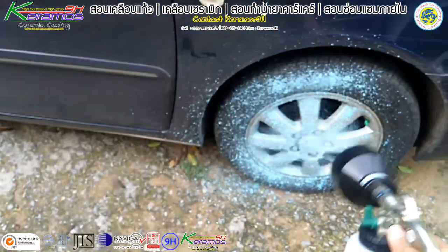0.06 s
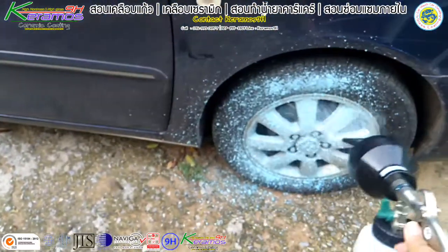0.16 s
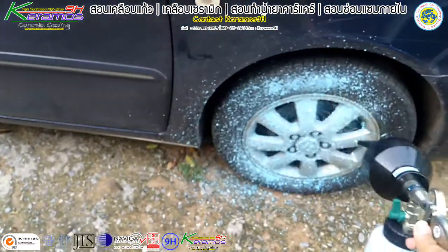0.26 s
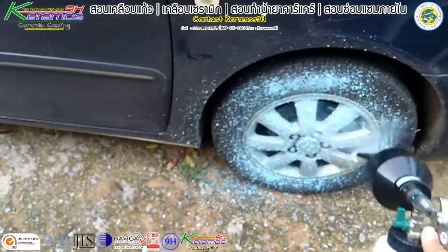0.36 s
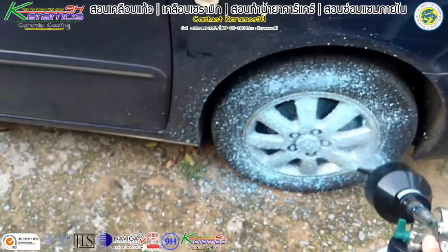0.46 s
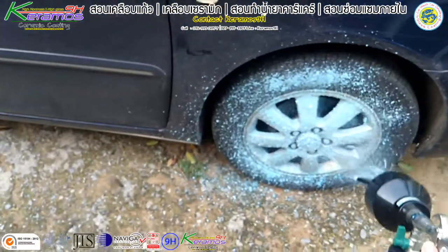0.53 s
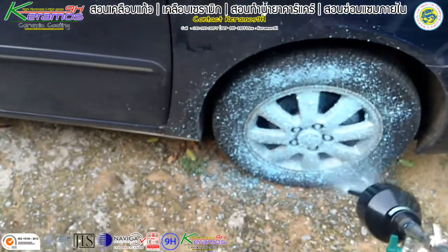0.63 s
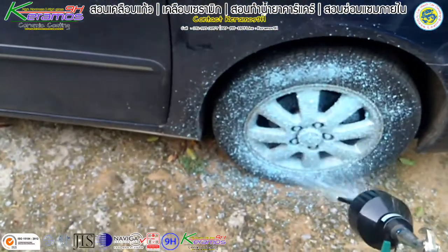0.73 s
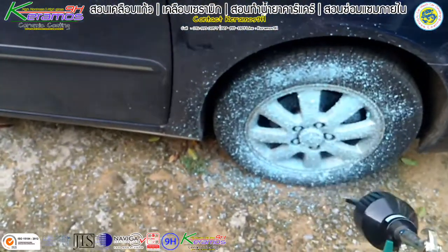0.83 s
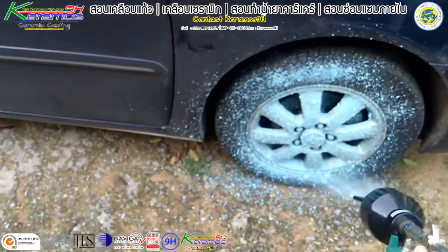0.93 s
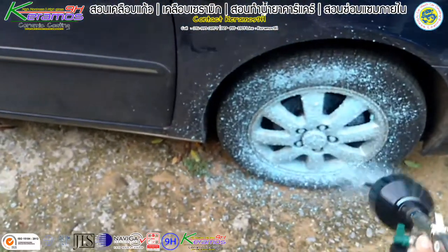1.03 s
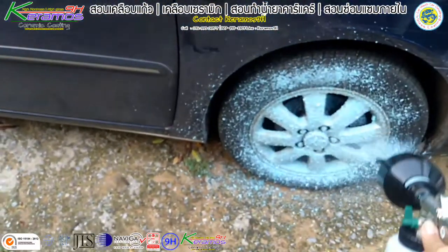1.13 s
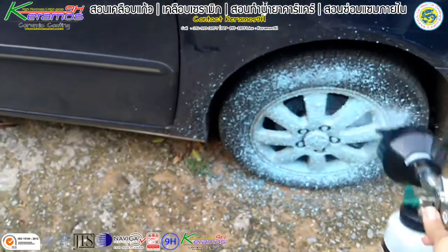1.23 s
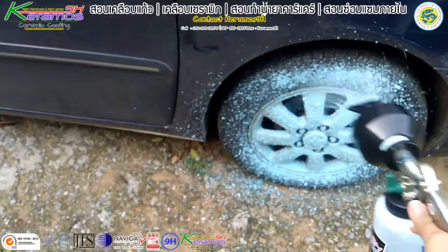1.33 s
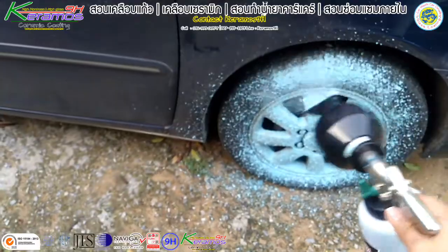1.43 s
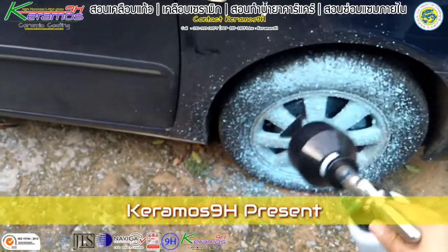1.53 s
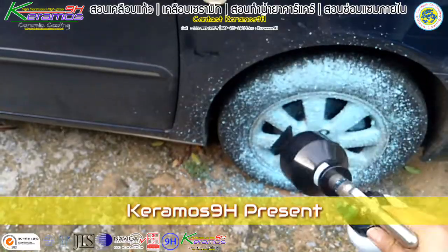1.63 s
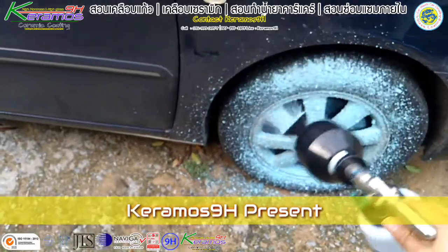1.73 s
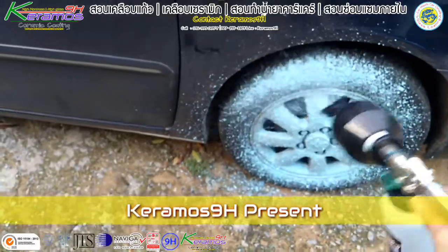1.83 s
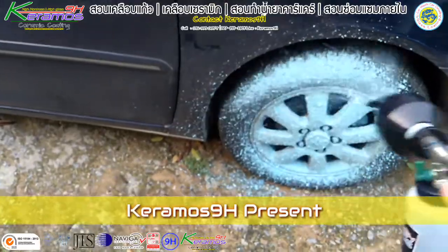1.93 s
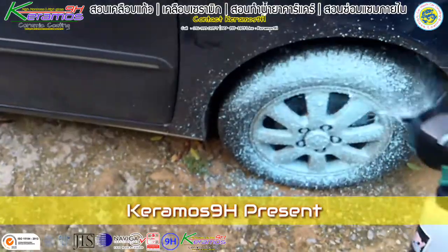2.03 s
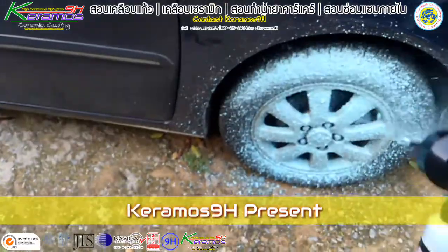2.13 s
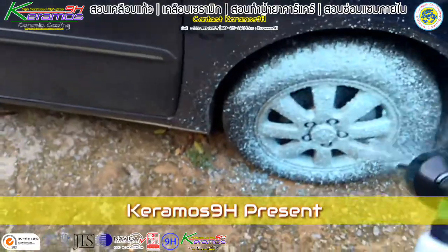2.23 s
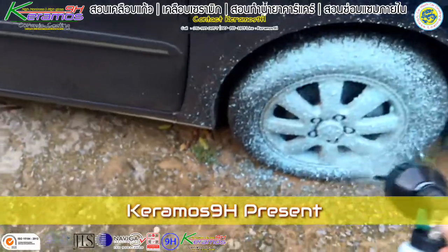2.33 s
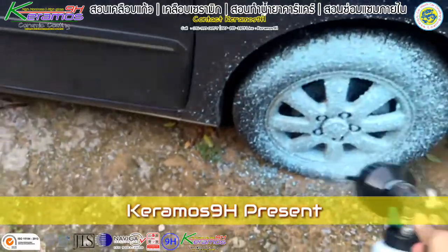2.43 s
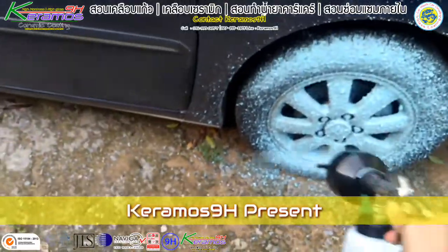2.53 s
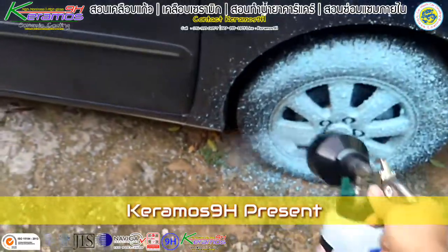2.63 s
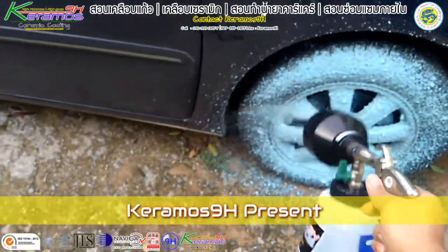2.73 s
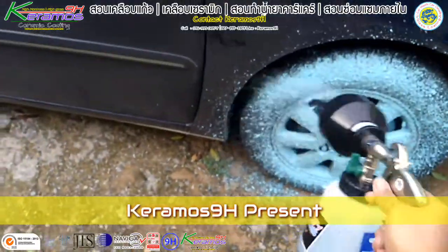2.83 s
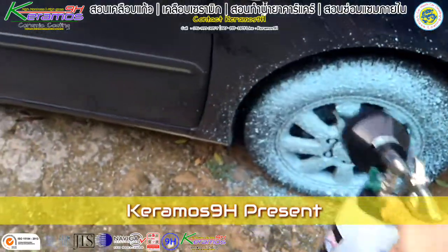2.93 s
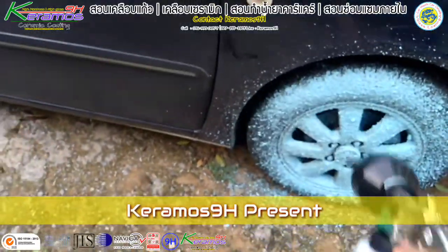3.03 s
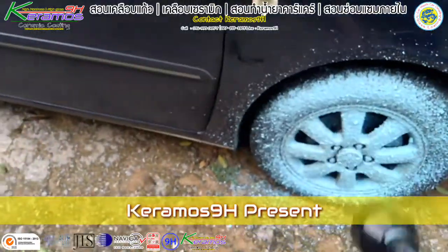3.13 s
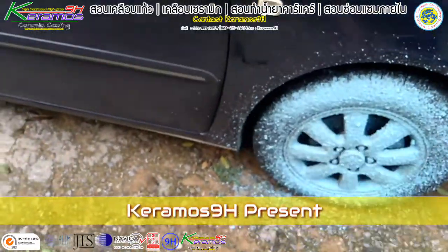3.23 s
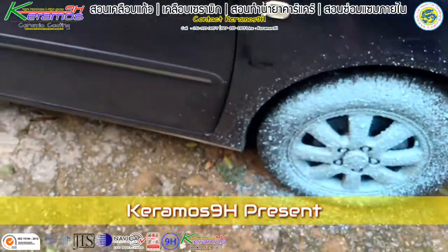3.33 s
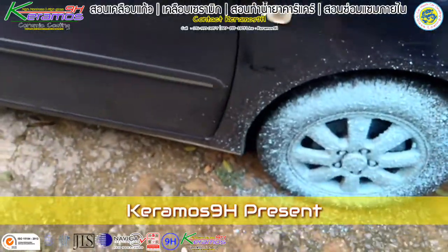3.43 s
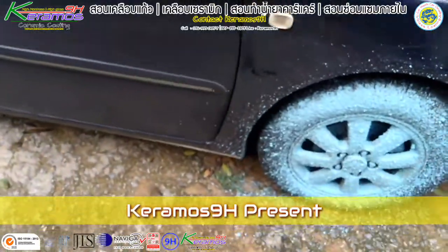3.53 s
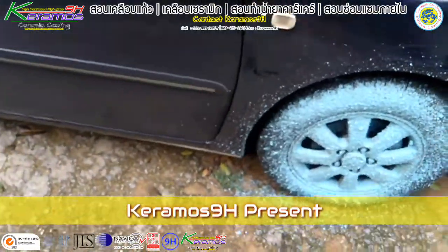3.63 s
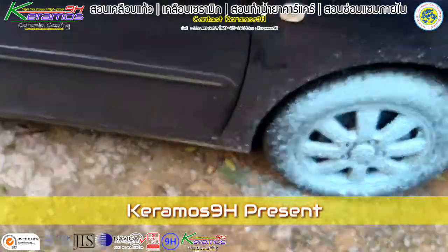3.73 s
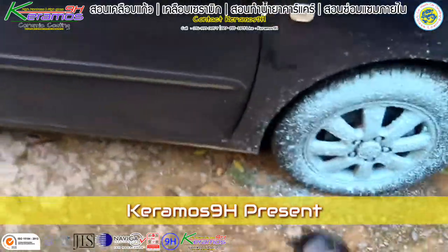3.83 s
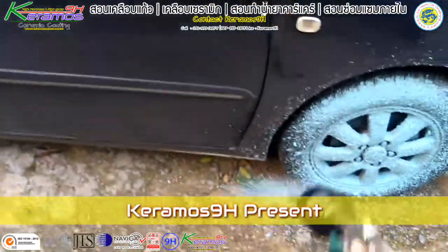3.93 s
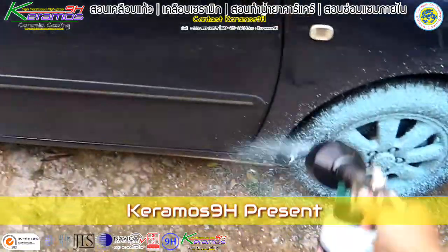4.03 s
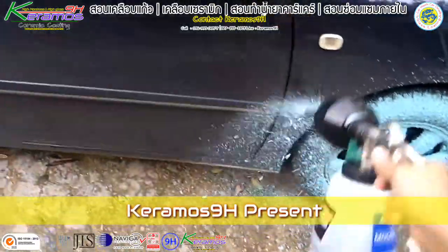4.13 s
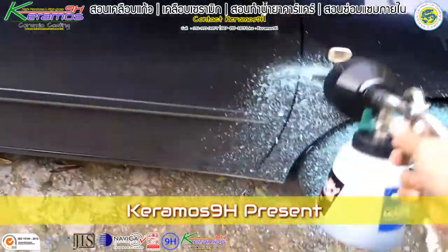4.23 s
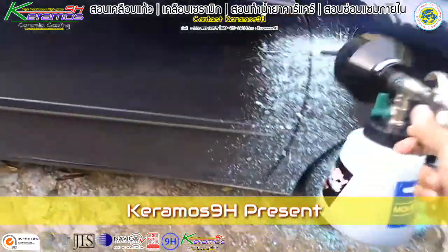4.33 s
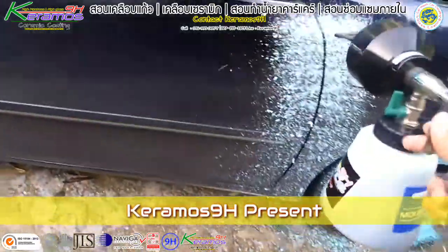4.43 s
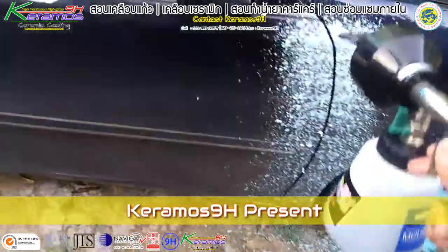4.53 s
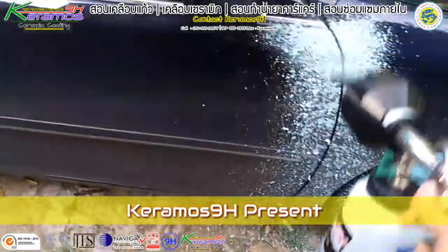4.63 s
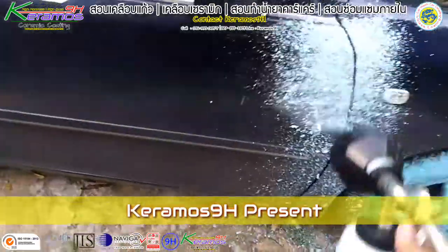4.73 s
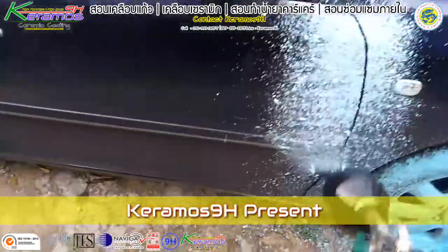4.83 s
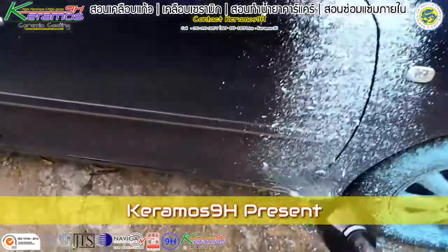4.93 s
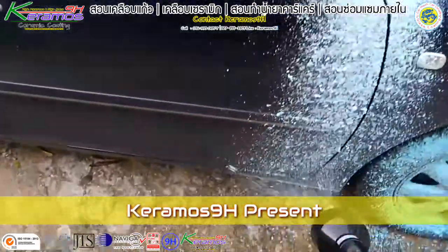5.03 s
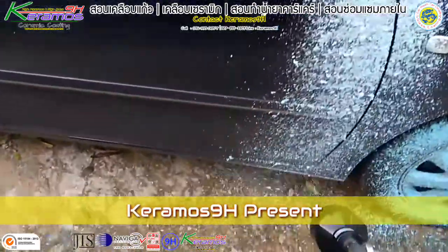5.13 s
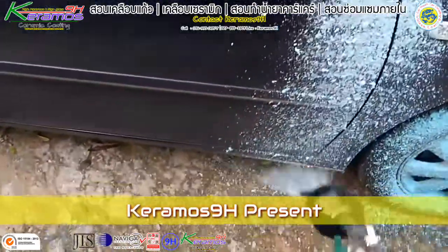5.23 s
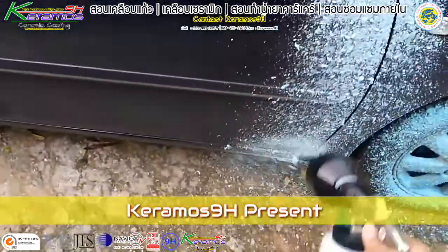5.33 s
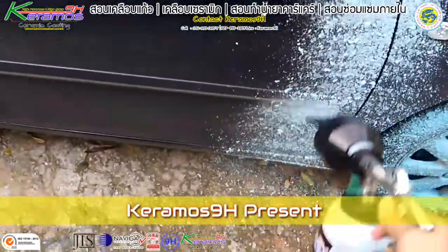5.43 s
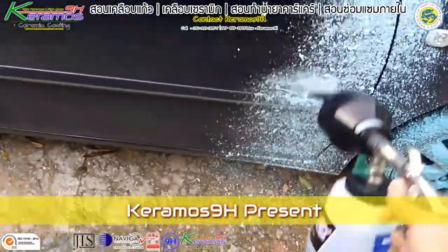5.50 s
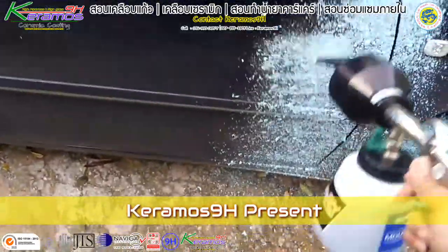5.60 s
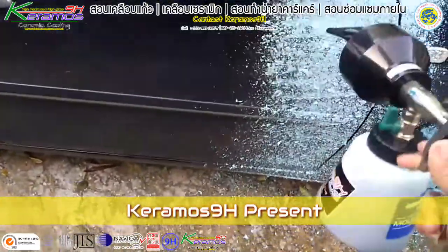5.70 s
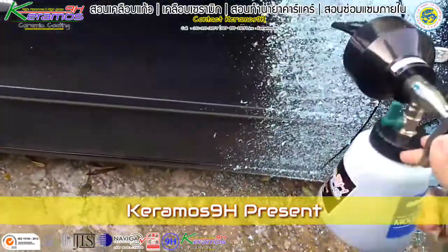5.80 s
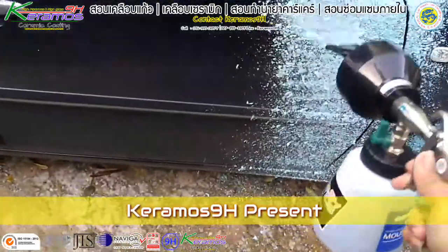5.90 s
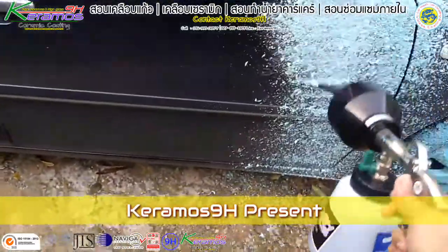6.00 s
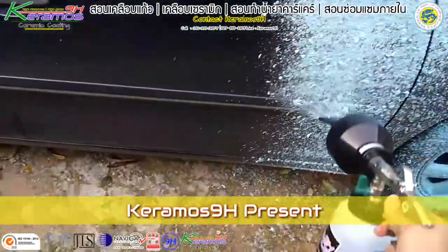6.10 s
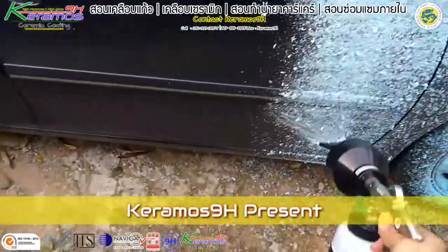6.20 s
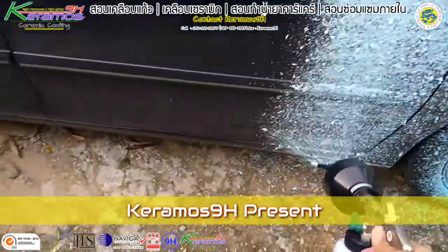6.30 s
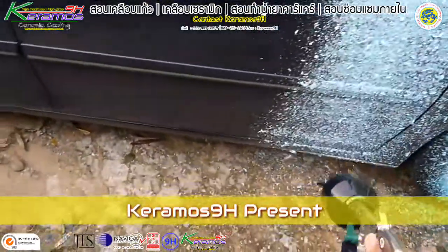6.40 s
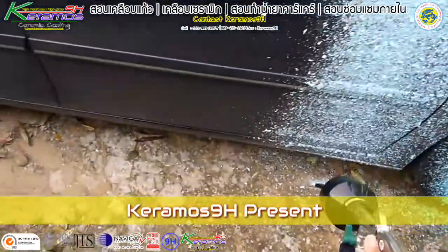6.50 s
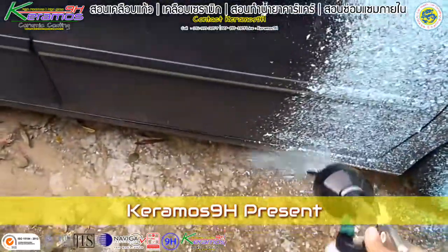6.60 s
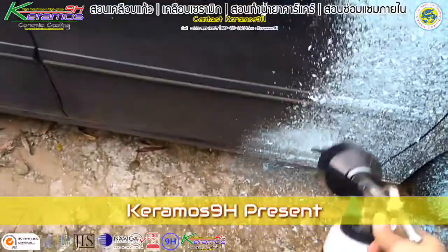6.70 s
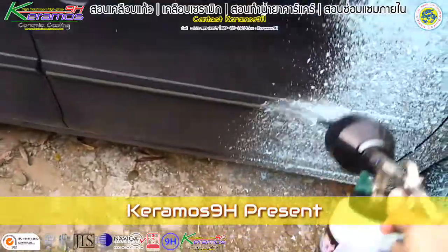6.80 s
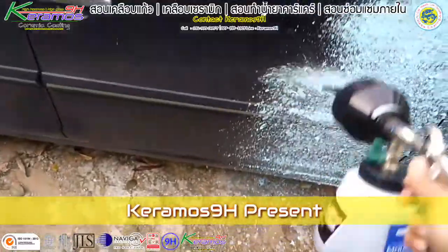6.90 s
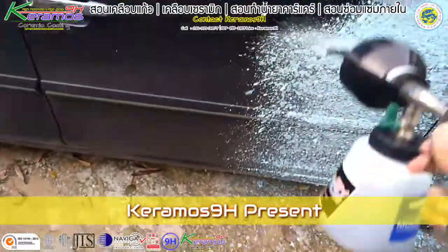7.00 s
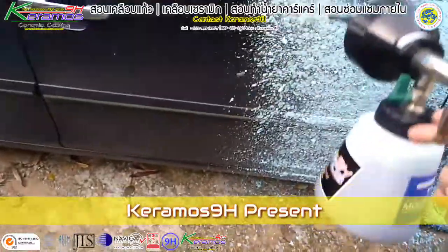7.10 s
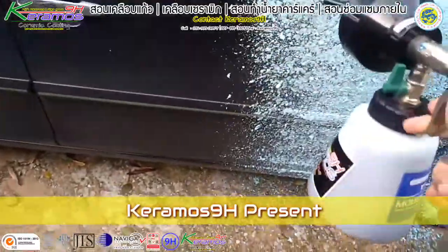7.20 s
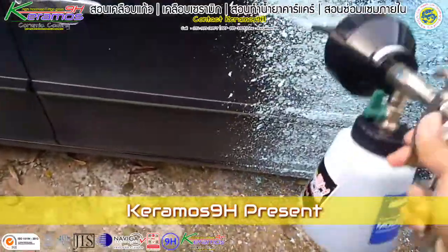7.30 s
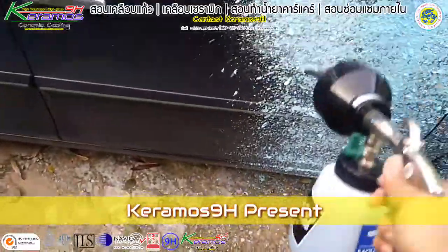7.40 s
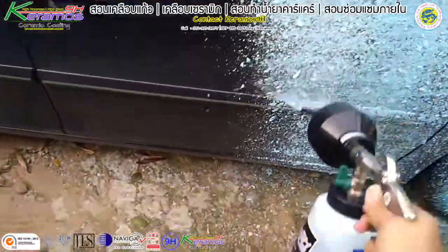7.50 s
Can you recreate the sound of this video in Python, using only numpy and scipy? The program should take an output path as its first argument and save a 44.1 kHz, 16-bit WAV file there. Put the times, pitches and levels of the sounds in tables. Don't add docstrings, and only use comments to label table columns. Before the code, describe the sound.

Outdoors beside a car on gravel, a compressed-air foam gun is already spraying. Ten loud, gritty hisses follow one another, first at the wheel with one long pull, then, after a one-second pause, shorter regular pulls at the door. Most end with a quick high whistle. A compressor thumps and hums low in the gaps, and a far engine faintly revs late. Close phone microphone, wide stereo, spray brighter and stronger on the right.

```python
import sys
import numpy as np
from scipy import signal
from scipy.fft import rfft, irfft, next_fast_len
from scipy.io import wavfile
from scipy.ndimage import uniform_filter1d, map_coordinates

SR = 44100
rng = np.random.default_rng(int(sys.argv[2]) if len(sys.argv) > 2 else 0)


def materialize(psi):
    bounded = np.clip(np.atleast_2d(psi).T, -1, 1)
    quanta = np.round(bounded * 32767).astype(np.int16)
    wavfile.write(sys.argv[1], SR, quanta)


def boost(x):
    u = np.asarray(x, float) / 20
    return 10 ** u


N = 332955
PAD = next_fast_len(N + SR)
TIME = np.arange(N) / SR
HZ = np.maximum(np.fft.rfftfreq(PAD, 1 / SR), 1)
DOOR_TURN_S = 3.5

# valve cracks open in seconds, full flow in seconds,
# finger lets go in seconds, level of the first crack in dB.
TRIGGER_PULLS = [
    (-.3, -.2, 0.38, -25),
    (0.461, 0.492, 0.92, -23),
    (1.037, 1.062, 1.5674, -22),
    (1.836, 1.864, 2.962, -27),
    (3.975, 4.006, 4.54, -32),
    (4.678, 4.707, 5.197, -26.5),
    (5.327, 5.352, 5.845, -27),
    (5.979, 6.003, 6.479, -28.5),
    (6.626, 6.65, 7.24, -24),
    (7.342, 7.402, 7.706, -36),
]


def valve():
    closed_db, blow_db = -66, -6
    spit_s = .004
    pulls = []
    for crack, full, off, crack_db in TRIGGER_PULLS:
        times = [crack - spit_s, crack, full - spit_s, full, off, off + 0.019, off + 0.067, off + 0.26]
        levels_db = [closed_db, crack_db, blow_db, 0, 0, -32.5, -49, closed_db]
        pulls.append(np.interp(TIME, times, levels_db))
    return np.max(pulls, axis=0)


# flow at first in dB, flow at last in dB, splash against the jet in dB,
# fine hiss against the jet in dB, brightest frequency in Hz.
PULL_AIMS = [
    (-19.5, -19.5, -11, -10, 5050),
    (-20, -24, -11, -9, 5000),
    (-21, -21.5, -11, -8, 4800),
    (-20.5, -22, -10.5, -9, 5050),
    (-19, -22, -11.5, -8.5, 5150),
    (-18.5, -21, -11, -8, 5000),
    (-19.5, -20, -11, -7.5, 5640),
    (-19, -22, -12, -7.5, 5940),
    (-20, -20.5, -11, -8, 5200),
    (-18, -24, -12, -8.5, 5900),
]
# middle in seconds, length in seconds, change of flow in dB.
WRIST_SWINGS = [(.07, .03, 1.5), (2.0, 0.047, -0.5), (2.13, 0.045, -1), (2.43, 0.09, -1.5),
                (2.764, 0.084, 2.5), (4.2, 0.086, 0), (5.75, 0.05, 1.5), (6.09, .03, -2.5),
                (6.2, 0.045, 1.8), (6.3, 0.021, -1), (6.68, .04, -2), (7.098, 0.078, 1.1)]


def flow():
    surge_db, surge_s = 3, 0.065
    crack, full, off, _ = np.transpose(TRIGGER_PULLS)
    pull = np.searchsorted(crack[1:], TIME)
    first_db, last_db, *aim = np.array(PULL_AIMS)[pull].T
    since = np.maximum(TIME - full[pull], 0)
    sag_db = (last_db - first_db) * np.minimum(since / (off - full)[pull], 1)
    change_db = surge_db * np.exp(-since / surge_s) + sag_db + swells(WRIST_SWINGS)
    return first_db, change_db, aim


# frequency in Hz, level in dB per Hz.
JET_COLOUR = [(150, -29), (250, -14), (388, -17), (535, -18.5), (951, -6.5), (1150, -3), (1610, -4.5),
              (2290, -3), (2760, -4.5), (3300, -2), (5300, 0.5), (7000, -2.5), (10000, -3), (14300, -10)]


def jet(opening_db, sputter_db):
    jet_db, change_db, (splash_db, fine_db, _) = flow()
    splash_db = splash_db + 0.62 * change_db
    fine_db = fine_db + 0.61 * change_db
    soap_lag_s = 0.0032
    soap_db = np.minimum(opening_db, np.interp(TIME - soap_lag_s, TIME, opening_db))
    noise = rfft(rng.standard_normal(PAD)) * boost(at_hz(JET_COLOUR))
    low = 1 / (1 + (HZ / 2000) ** 6)
    high = 1 / (1 + (7000 / HZ) ** 10)
    # band, level in dB, how unevenly it sputters
    parts = [(low, splash_db + 0.74 * soap_db, 1.1),
             (1 - low - high, change_db + opening_db, .9),
             (high, fine_db + 0.59 * opening_db, .4)]
    out = 0
    for band, level_db, uneven in parts:
        flicker_db = uneven * (sputter_db + 0.85 * drift(28))
        out = out + boost(jet_db + level_db + flicker_db) * rms_one(irfft(noise * band, PAD)[:N])
    return out


def patches(x, patchy_db, streak_db, peak_db):
    hz, s, frames = signal.stft(x, SR, nperseg=512)
    wide = blotches(frames.shape, 6, 8)
    thin = blotches(frames.shape, 1, 8)
    brightest_hz = flow()[-1][-1] + 130 * drift(9.0)
    peak_hz = brightest_hz[np.minimum(s * SR, N - 1).astype(int)]
    bright = np.exp(-((hz[:, None] - peak_hz) / 600) ** 2)
    on_wheel = np.where(s < DOOR_TURN_S, 1.6, .9)
    gain = boost(patchy_db * wide + streak_db * thin + peak_db * bright * on_wheel)
    return signal.istft(frames * gain, SR, nperseg=512)[1][:N]


# time in seconds, pitch in Hz, level in dB.
SHUTTING_WHISTLES = [
    (.4, 5800, -34),
    (.935, 8000, -35),
    (1.585, 8120, -32),
    (2.972, 8000, -26),
    (4.56, 7400, -33),
    (5.21, 8000, -34),
    (5.86, 8350, -34),
    (6.492, 8020, -26),
    (7.255, 8100, -27),
]


def whistle():
    out = np.zeros(N)
    for s, hz, db in SHUTTING_WHISTLES:
        swell = np.exp(np.where(TIME < s, (TIME - s) / 0.021, (s - TIME) / 0.003))
        out += boost(db) * swell * narrow(hz, 250)
    return out


# time in seconds, pitch in Hz, level in dB.
TRIGGER_TICKS = [
    (1.008, 3600, -37),
    (3.232, 4600, -46),
    (3.969, 5060, -31),
]


def clicks():
    out = np.zeros(N)
    for s, hz, db in TRIGGER_TICKS:
        out += boost(db) * (TIME > s) * np.exp(-np.abs(TIME - s) / 0.0051) * narrow(hz, 900)
    return out


# time in seconds, extra travel time in ms.
GROUND_ECHO = [(0, 2.54), (.38, 4), (.47, 2.94), (.75, 2.47), (1.1, 2.44), (1.87, 3.8), (2.1, 2.94),
               (2.57, 2.09), (2.96, 3.17)]
# time in seconds, extra travel time in ms.
DOOR_ECHO = [(4.02, 1.4), (4.3, 0.92), (4.531, 1.24), (4.88, 0.75), (5.7, 0.84), (5.95, 1.17), (6.25, 0.75),
             (7.1, 1.08), (7.54, 1.36)]


def echoes(source):
    echo_ms, = in_time(GROUND_ECHO + DOOR_ECHO)
    low_aim = TIME < DOOR_TURN_S
    extra_ms = echo_ms - np.where(low_aim, 2.49, 0.73)
    echo_db = np.where(low_aim, -10, -13.5) - 9.5 * extra_ms
    echo_db += 2.5 * drift(2.5)
    dull = shape(source, 1 / (1 + (HZ / 3500) ** 2))
    out = source + boost(echo_db + 5.5) * late(dull, echo_ms)
    for ms, sign in [(.33, 0.46), (1.45, -0.91), (1.9, 1)]:
        out += sign * boost(-18.0) * late(source, ms * (1 + 0.129 * drift(0.93)))
    return out


# delay in ms, level in dB, sign.
LEFT_PATHS = [(0.3804, 2.5, 1), (0.036, -7, -1.2), (0.013, -10, -0.89)]
# frequency in Hz, share of the left side (0 to 1).
SPRAY_SHARED = [(300, .995), (860, 0.82), (1400, 0.35), (2400, 0.28), (5000, 0.13), (8000, 0.092),
                (14000, 0.14)]
# frequency in Hz, left minus right in dB.
LEFT_SHADOW = [(60, -17), (110, -19), (200, -5), (370, 0.5), (680, -7), (1250, -10.5), (2290, -5.5),
               (4190, -6), (7690, -4.5), (14100, -13.5)]


def microphones(near, far):
    right = late(near, 0.45)
    alike = np.clip(at_hz(SPRAY_SHARED), 0, 1)
    steered = sum(sign * boost(db) * late(near, ms) for ms, db, sign in LEFT_PATHS)
    bass = 1 / (1 + (HZ / 500) ** 4)
    common = shape(steered, boost(3.0) * (1 - bass)) + shape(right, boost(3.0) * bass)
    left = shape(common, alike) + shape(far, np.sqrt(1 - alike ** 2))
    left = boost(-1.78) * shape(left, boost(at_hz(LEFT_SHADOW)))
    return boost(2.0) * np.array([left, right])


def walls(source):
    s = TIME[:SR // 2]
    tails = 0
    for db, t60, cut_hz in [(-36.5, 0.21, 11400), (-53, 0.86, 4400)]:
        tail = rng.standard_normal((2, len(s))) * boost(db - 60 * s / t60) * (s > .004)
        tails = tails + rfft(tail, PAD) / (1 + (HZ / cut_hz) ** 2) / (1 + (500 / HZ) ** 2)
    return shape(source, tails) * boost([[-3.5], [0]])


# time in seconds, level in dB.
THUMP_LEVEL = [(0, -37), (.1, -25.5), (.6, -28), (1.2, -29), (1.6, -26), (2.2, -30), (2.6, -26.5),
               (3.7, -25.5), (4.5, -33), (5.2, -37.5), (6.0, -34), (6.6, -31.5), (7.0, -34), (7.55, -59)]
# multiple of the stroke rate, level in dB.
STROKE_TONES = [(4, -19), (6, 0), (7, -21), (8, -23), (9, -22), (11, -26), (12, -24), (16, -28)]
# frequency in Hz, level in dB per Hz.
RUMBLE_COLOUR = [(15, -20), (30, -6), (50, 3), (100, -3.5), (160, -9), (230, -8), (300, -22.5), (500, -70)]
# middle in seconds, length in seconds, change in dB.
RUMBLE_BUMPS = [
    (.65, 0.064, -18),
    (1.42, .04, 14.5),
    (3.5, 0.33, 2),
    (4.7, 0.42, 5),
    (6.6, .3, -10),
]
# middle in seconds, length in seconds, gain in dB.
MOTOR_THROBS = [
    (.7, .12, 6),
    (2.2, .12, 10),
    (3.25, .15, 5),
    (4.9, .1, 6),
    (6.3, .6, 8.5),
]
# middle in seconds, length in seconds, gain of its overtones in dB.
MOTOR_STRAINS = [
    (.12, .08, 9.5),
    (.8, 0.092, 11.5),
    (1.17, 0.17, 16.5),
    (1.55, 0.13, 13),
    (1.85, 0.18, 13.5),
    (2.6, .12, 10.5),
    (3.3, .15, 7),
    (4.9, .1, 13),
]


def compressor():
    stroke_hz, motor_hz = 12.935, 67.2
    thump_db, = in_time(THUMP_LEVEL)
    turn_db = thump_db - thump_db.mean()
    motor_db = -42 + 0.48 * turn_db + swells(MOTOR_THROBS)
    overtone_db = -54 + 0.48 * turn_db + swells(MOTOR_STRAINS)
    rumble_db = -44 + 0.23 * turn_db + 2.0 * drift(2.0) + swells(RUMBLE_BUMPS)
    mid, side = rms_one(shape(rng.standard_normal((2, N)), boost(at_hz(RUMBLE_COLOUR))))
    out = boost(rumble_db + 1.0) * (mid + 0.18 * side * np.array([[1], [-1]]))
    stroke_waver = 0.0014 * drift(1.0)
    motor_waver = 0.00344 * drift(1.0)
    for order, db in STROKE_TONES:
        out += hum_line(order * stroke_hz, thump_db + db, stroke_waver)
    out += hum_line(motor_hz, motor_db, motor_waver)
    for order in (2, 3):
        out += hum_line(order * motor_hz, overtone_db - 4.5, motor_waver)
    return out


# middle in seconds, length in seconds, gain in dB.
ENGINE_REVS = [
    (5.05, 0.49, 14.5),
    (6.6, .15, 9),
    (7.4, .25, 17),
]


def engine():
    hz = 155 - 3.5 * (TIME - 4.6)
    fade_in = np.clip((TIME - 4.3) / .3, 0, 1)
    return fade_in * hum_line(hz, -61.5 + swells(ENGINE_REVS), .012 * drift(2.5))


# frequency in Hz, level in dB per Hz.
YARD_COLOUR = [(150, -13.5), (260, -9), (273, -8.5), (453, -11), (536, -11), (574, -11.5), (691, -9.5),
               (920, -15.5), (3480, -27.5), (8490, -30.5), (14600, -47)]
# frequency in Hz, left-right likeness (0 to 1).
YARD_SHARED = [(60, 0.61), (180, 0.87), (530, 0.46), (1590, 0.049), (4730, 0.05), (14100, 0.06)]
# pitch in Hz, width in Hz, level in dB.
HOSE_LEAKS = [
    (5700, 770, -63.5),
    (8600, 350, -70),
]
# time in seconds, level in dB, length in seconds.
HAND_RUSTLES = [
    (3.235, -58, .012),
    (3.645, -57, .02),
    (3.9, -66, .01),
]


def yard():
    colour = boost(at_hz(YARD_COLOUR))
    alike = np.clip(at_hz(YARD_SHARED), 0, 1)
    mid, side = rng.standard_normal((2, N))
    mid = shape(mid, colour * np.sqrt(1 + alike))
    side = shape(side, colour * np.sqrt(1 - alike))
    out = boost(-53 + 4.5 + 0.53 * drift(4.8)) * rms_one(np.array([mid + side, mid - side]))
    for hz, width_hz, db in HOSE_LEAKS:
        out += boost(db + 2 * drift(12)) * np.array([narrow(hz, width_hz), narrow(hz, width_hz)])
    hiss = rms_one(shape(rng.standard_normal((2, N)), HZ / (HZ + 6000)))
    for s, db, length in HAND_RUSTLES:
        out += boost(db) * hiss * np.exp(-((TIME - s) / length) ** 2)
    return out * boost([[-1.1], [1.1]])


def hum_line(hz, level_db, waver):
    turn = 2 * np.pi * (np.cumsum(hz * (1 + waver)) / SR + rng.random())
    spread = 0.059 * np.array([[1], [-1]])
    return np.sqrt(2) * boost(level_db + .7 * drift(5)) * np.sin(turn + spread)


def narrow(hz, width_hz):
    return rms_one(shape(rng.standard_normal(N), 1 / (1 + (2 * (HZ - hz) / width_hz) ** 2)))


def swells(rows):
    return sum(db * np.exp(-((TIME - s) / length) ** 2) for s, length, db in rows)


def drift(rate_hz):
    coarse = 16
    size = next_fast_len(N // coarse + 2)
    hz = np.fft.rfftfreq(size, coarse / SR)
    slow = irfft(rfft(rng.standard_normal(size)) / (1 + (hz / rate_hz) ** 2), size)
    return np.interp(np.arange(N) / coarse, np.arange(size), rms_one(slow))


def blotches(shape_, bins, frames):
    field = rng.standard_normal(shape_)
    for axis, size in [(-2, bins), (-2, bins), (-1, frames), (-1, frames)]:
        field = uniform_filter1d(field, size=size, axis=axis)
    return rms_one(field)


def late(x, ms):
    return map_coordinates(x, [np.arange(N) - ms * SR / 1000], order=3, mode="nearest")


def shape(x, gain):
    return irfft(rfft(x, PAD) * gain, PAD)[..., :N]


def at_hz(points):
    hz, value = np.transpose(points)
    return np.interp(np.log(HZ), np.log(hz), value)


def in_time(rows):
    s, *columns = np.transpose(rows)
    return [np.interp(TIME, s, c) for c in columns]


def rms_one(x):
    return x / np.sqrt(np.mean(x ** 2) + 1e-20)


def scene():
    opening_db = valve()
    sputter_db = 1.46 * drift(78) + 1.0 * drift(190)
    piping = whistle() + clicks()
    near = patches(jet(opening_db, sputter_db), patchy_db=2.0, streak_db=2.5, peak_db=2.5) + piping
    far = patches(jet(opening_db, sputter_db), patchy_db=2.0, streak_db=2.5, peak_db=2.5) + piping
    return microphones(echoes(near), echoes(far)) + walls(near) + compressor() + engine() + yard()


def gaps(x):
    hz, s, frames = signal.stft(x, SR, nperseg=2048, noverlap=1536)
    hz = hz[:, None]
    power = uniform_filter1d(np.abs(frames) ** 2, size=2, axis=2)
    slot = uniform_filter1d(power, size=4, axis=1)
    around = uniform_filter1d(power, size=40, axis=1)
    masked = slot < around * boost(-16)
    seeds = 1. * (rng.random(frames.shape[1:]) < .0003 * (1 + (hz / 10500) ** 8))
    starved = uniform_filter1d(uniform_filter1d(seeds, size=5, axis=0), size=6, axis=1) > .01
    top_lost = (hz > 13850) & (drift(4)[np.minimum(s * SR, N - 1).astype(int)] > 1.3)
    dropped = (masked | starved) & (hz > 1300) | top_lost
    frames *= np.where(dropped, boost(-30), 1) * (hz < 14270)
    return signal.istft(frames, SR, nperseg=2048, noverlap=1536)[1][:, :N]


def low_pass(x):
    return signal.sosfilt(signal.butter(12, 14710, fs=SR, output="sos"), x)


def record(dry):
    soft = 1.084 * np.tanh(dry / 1.126)
    return low_pass(gaps(soft))


dry = scene()
out = record(dry)
materialize(out)
```